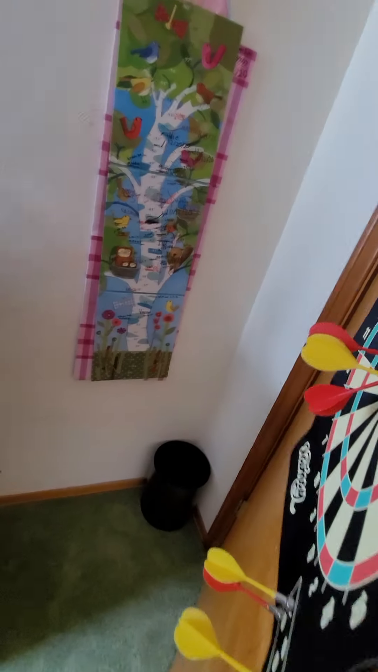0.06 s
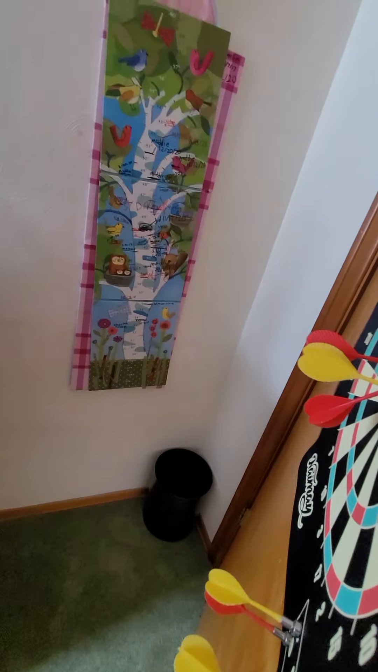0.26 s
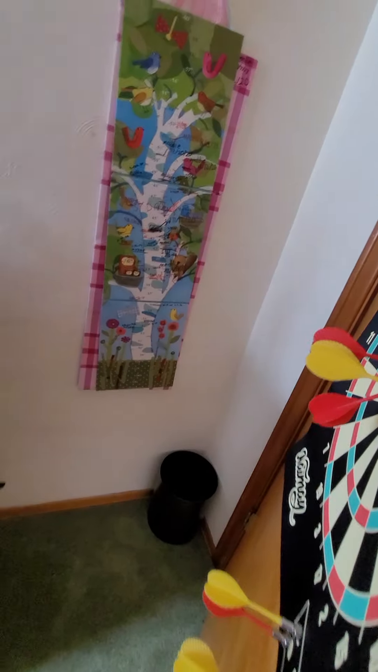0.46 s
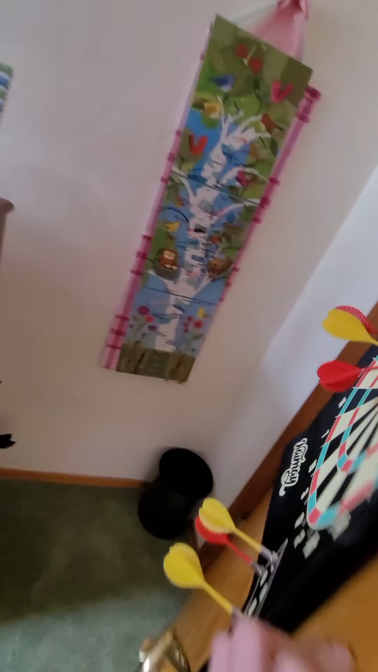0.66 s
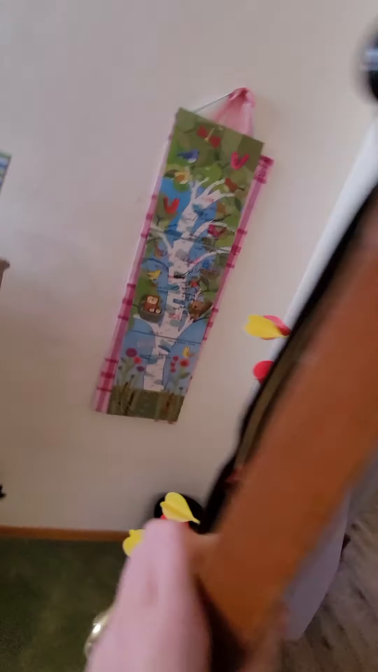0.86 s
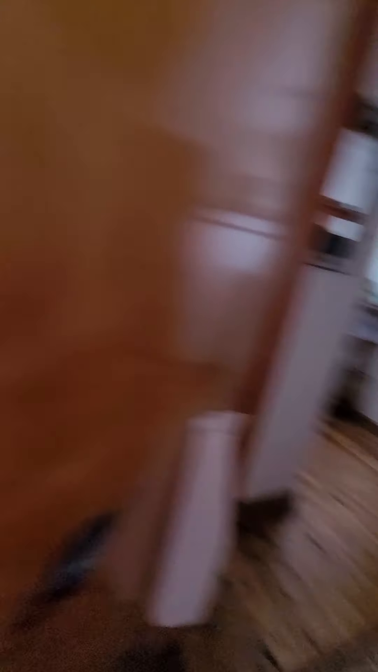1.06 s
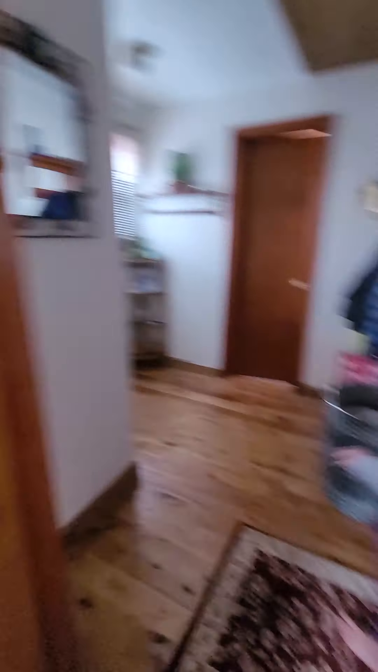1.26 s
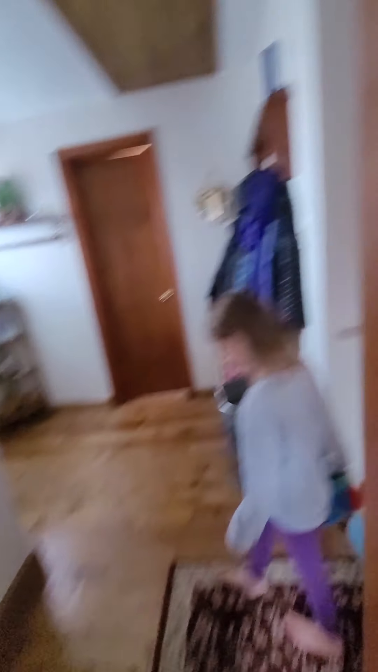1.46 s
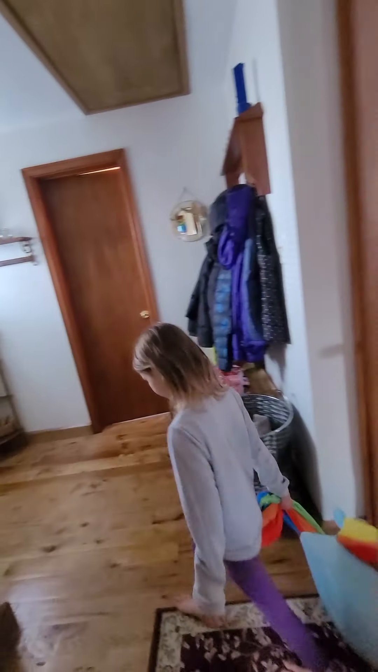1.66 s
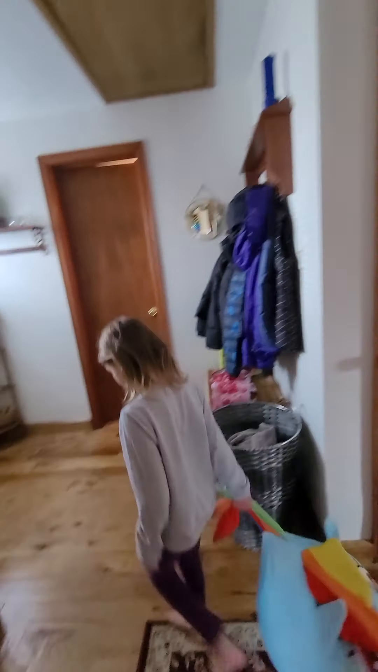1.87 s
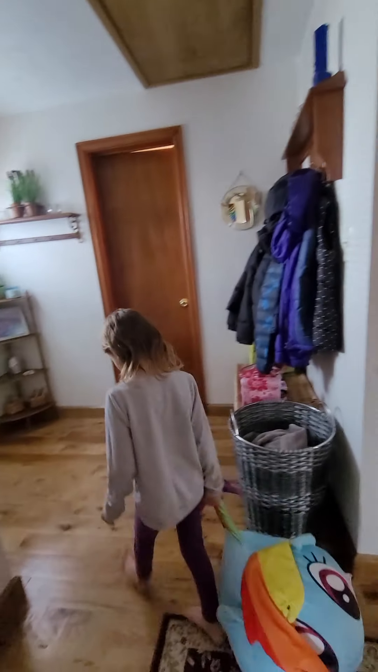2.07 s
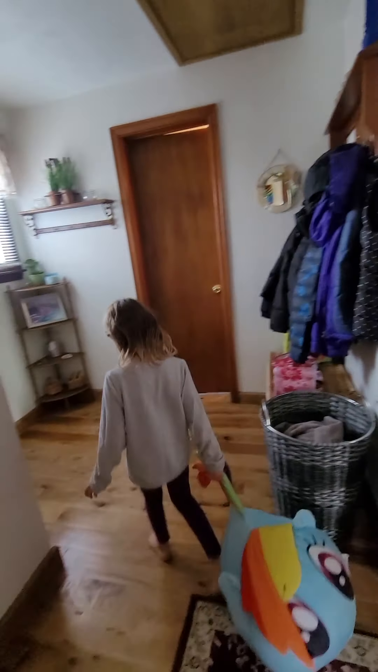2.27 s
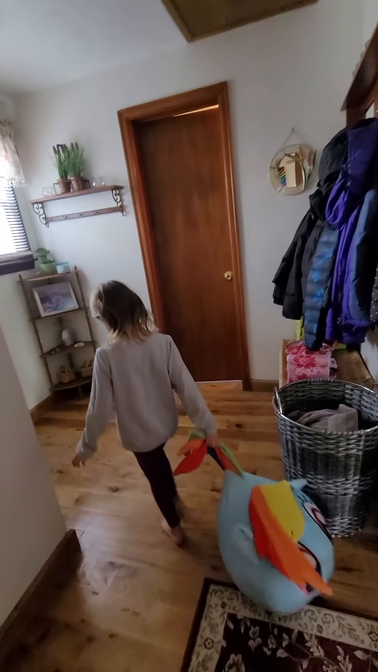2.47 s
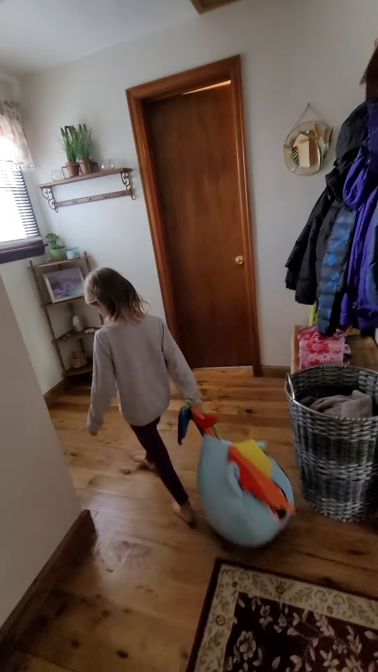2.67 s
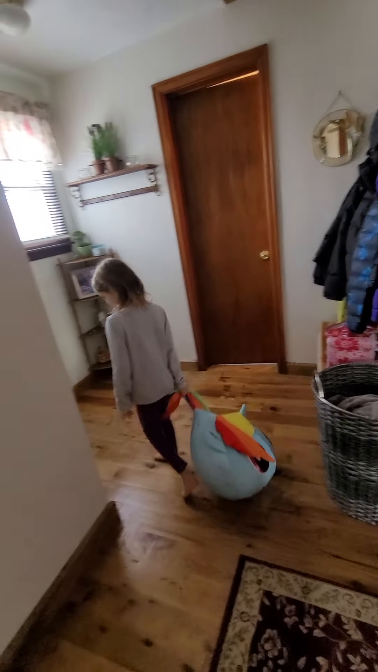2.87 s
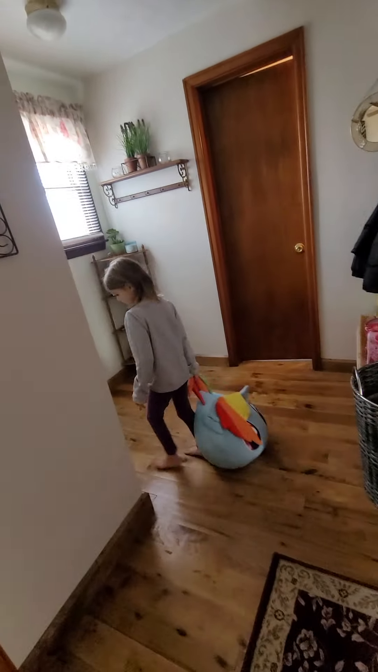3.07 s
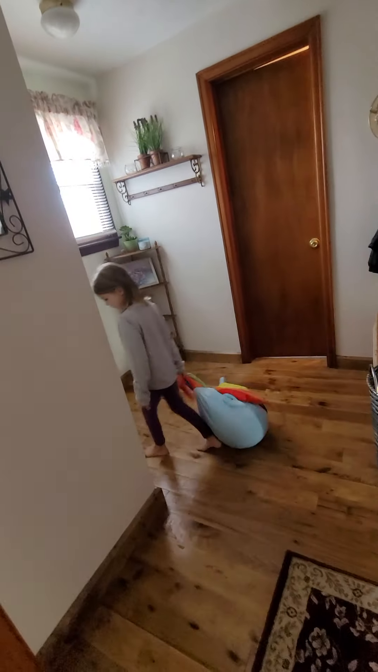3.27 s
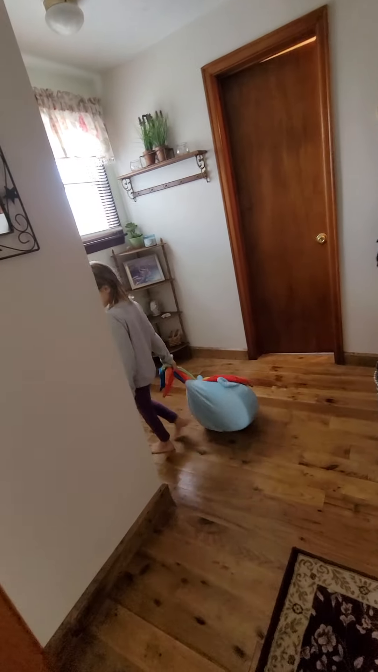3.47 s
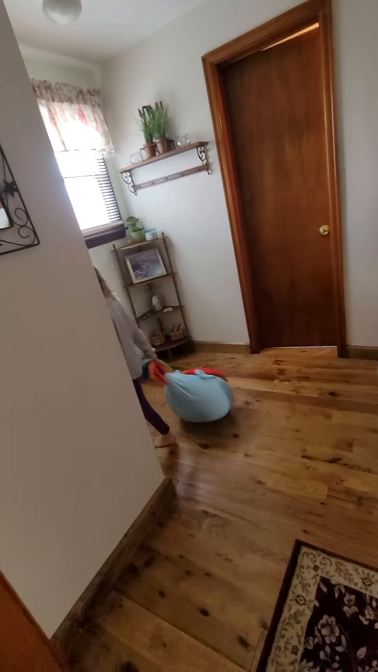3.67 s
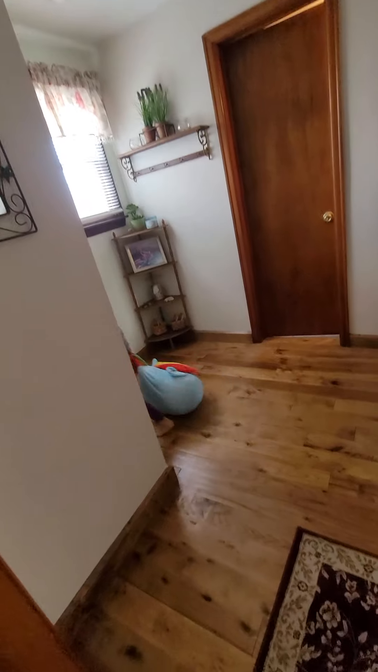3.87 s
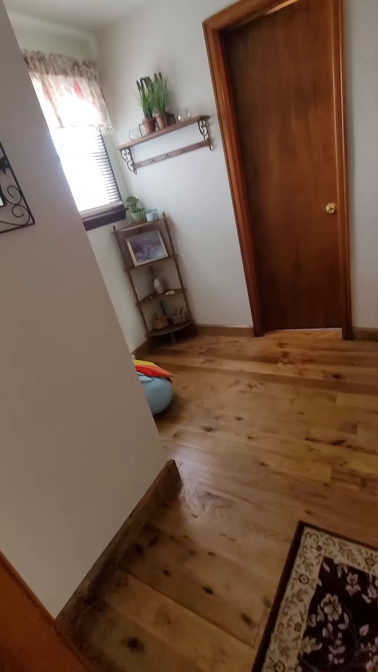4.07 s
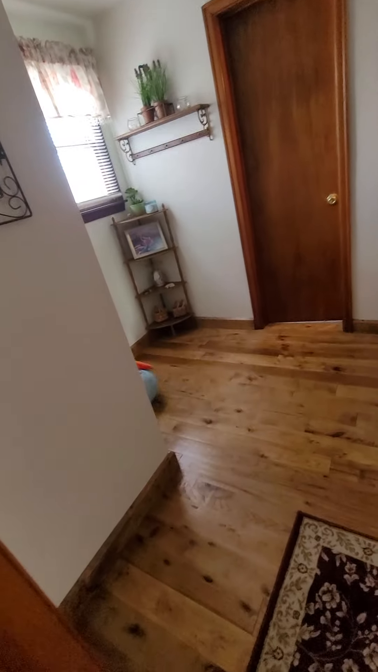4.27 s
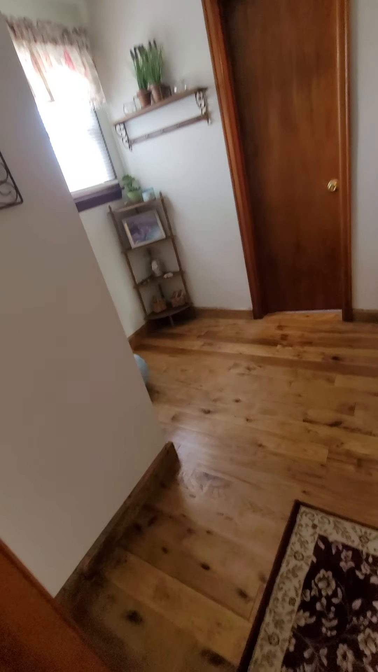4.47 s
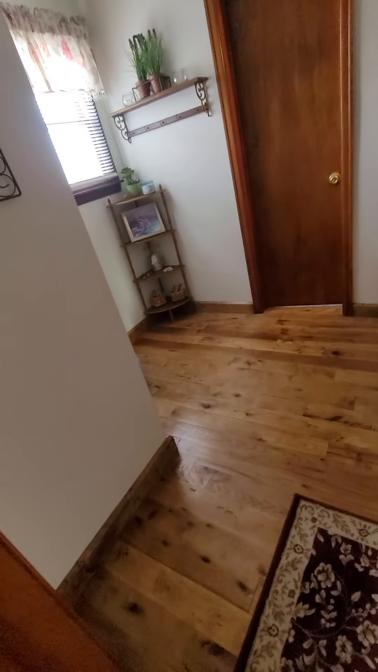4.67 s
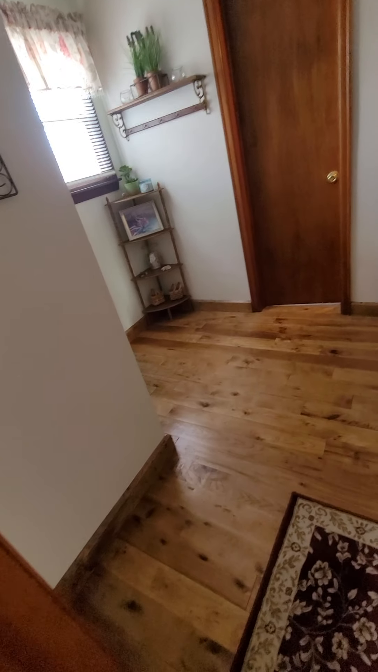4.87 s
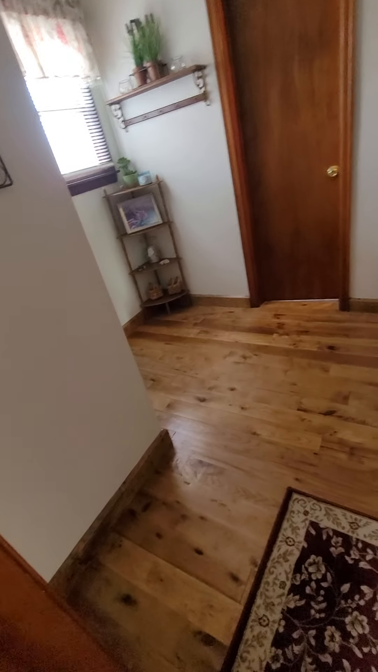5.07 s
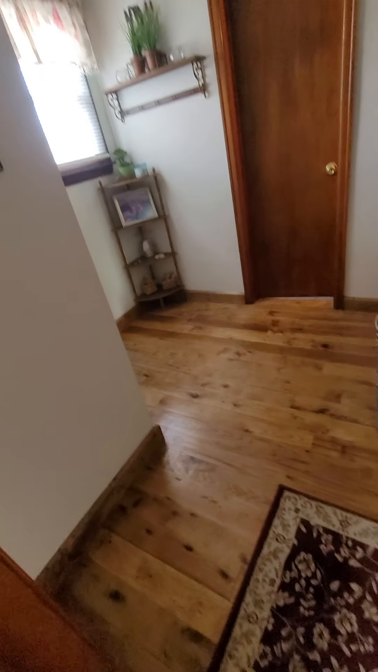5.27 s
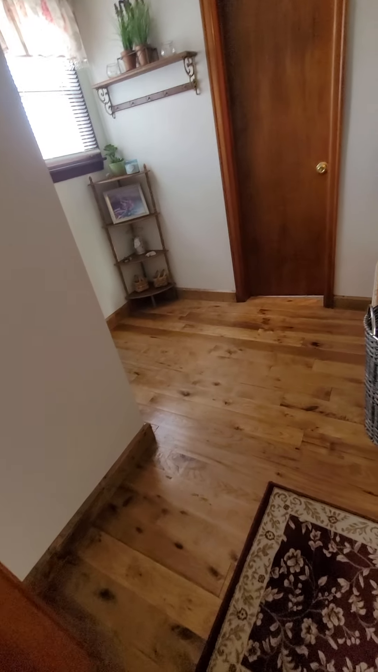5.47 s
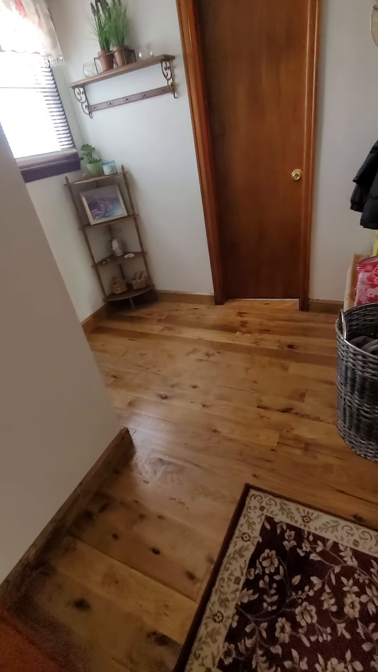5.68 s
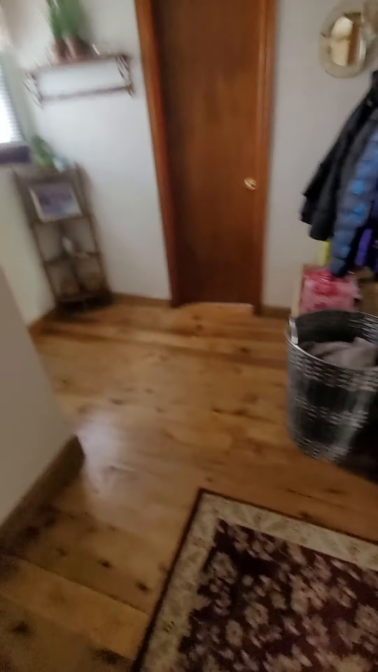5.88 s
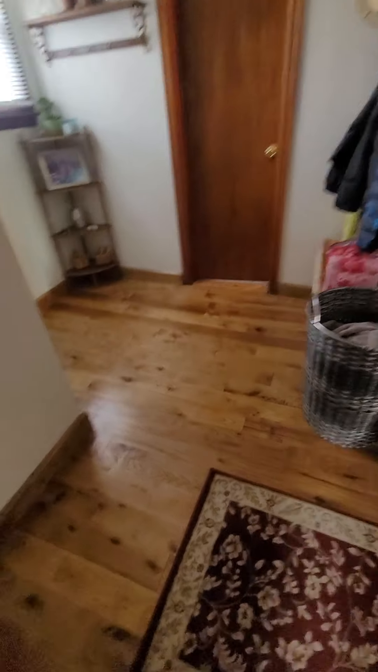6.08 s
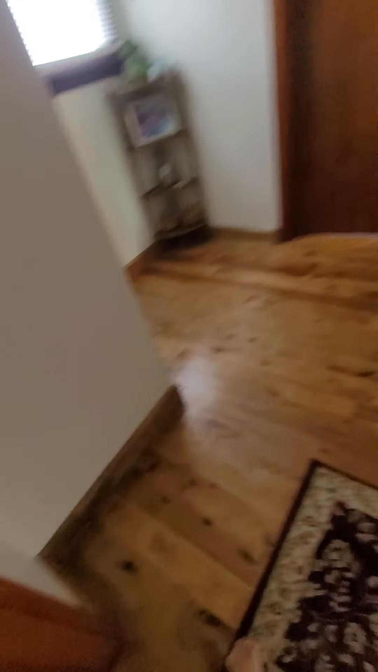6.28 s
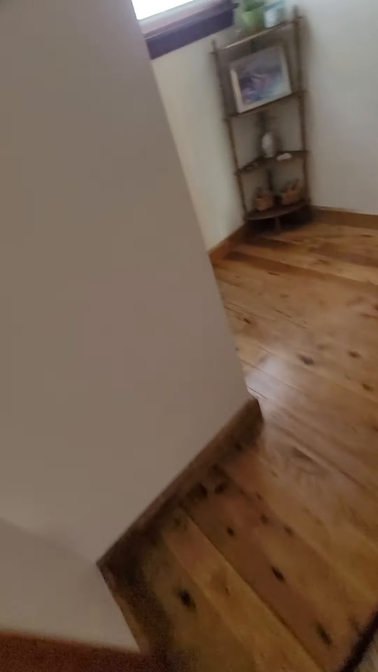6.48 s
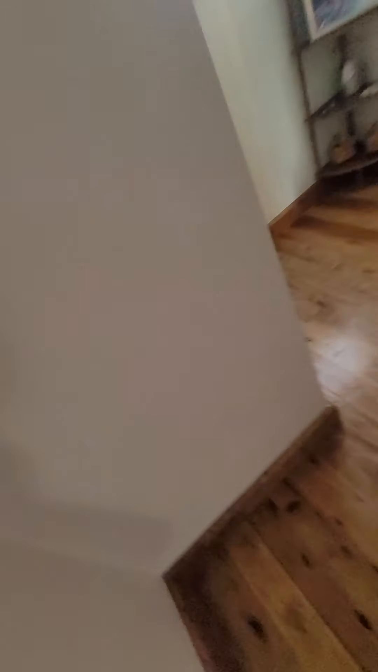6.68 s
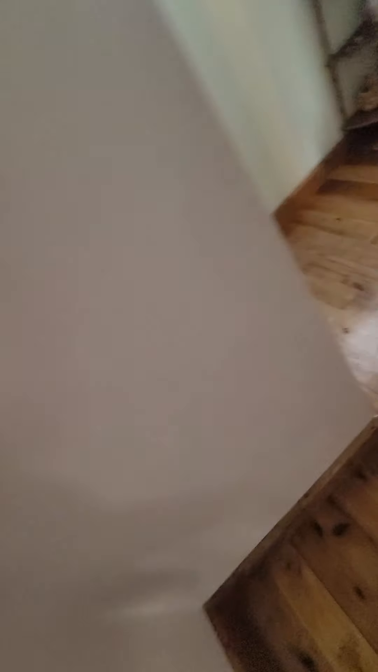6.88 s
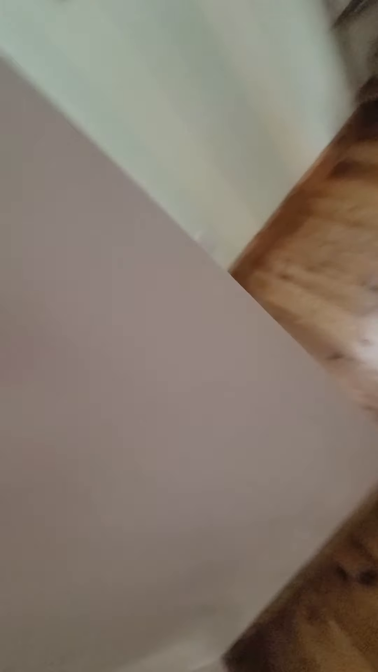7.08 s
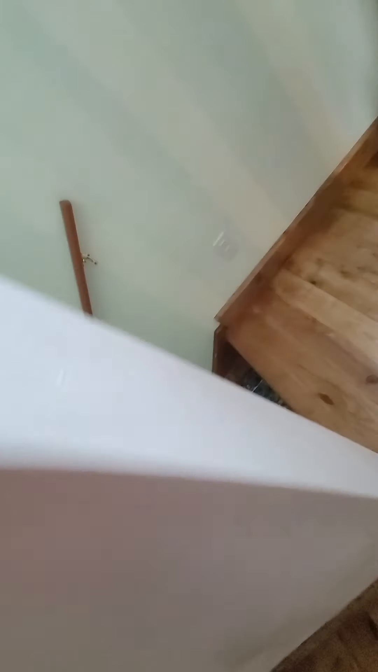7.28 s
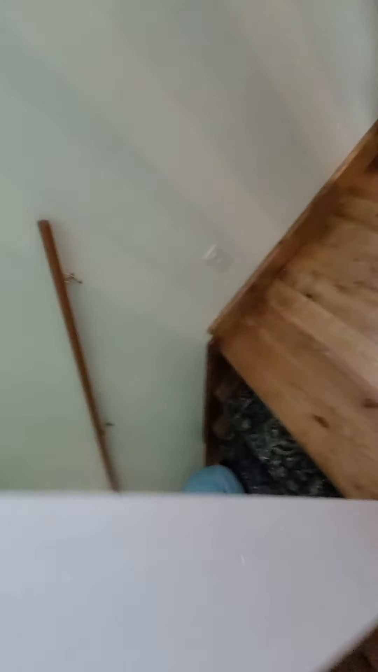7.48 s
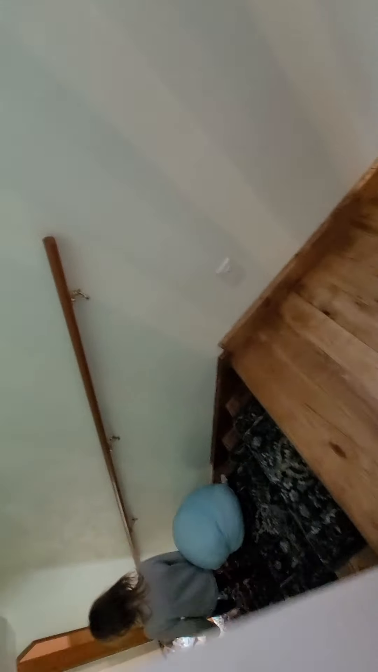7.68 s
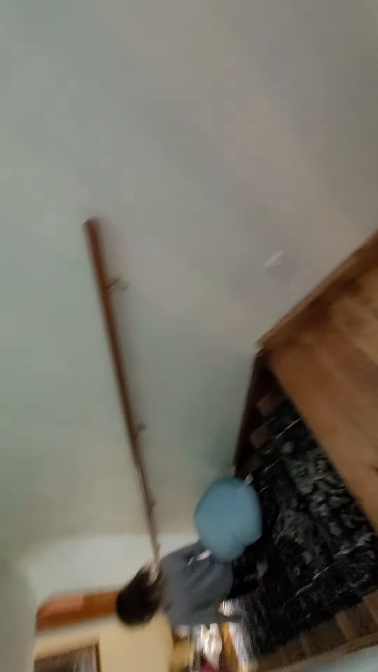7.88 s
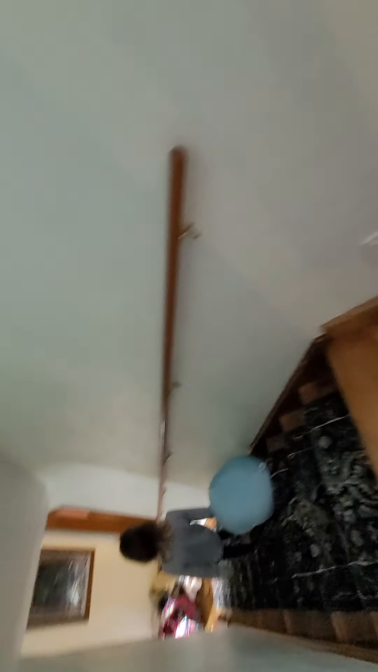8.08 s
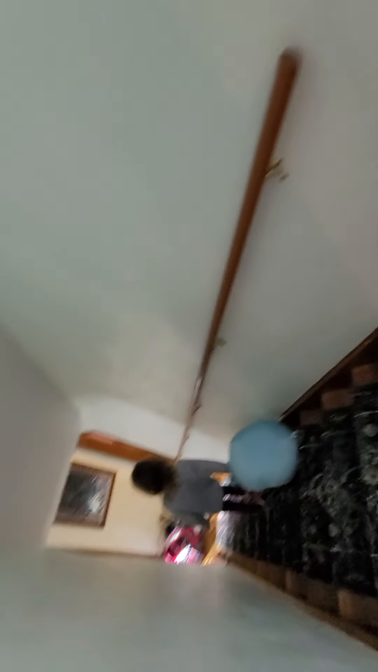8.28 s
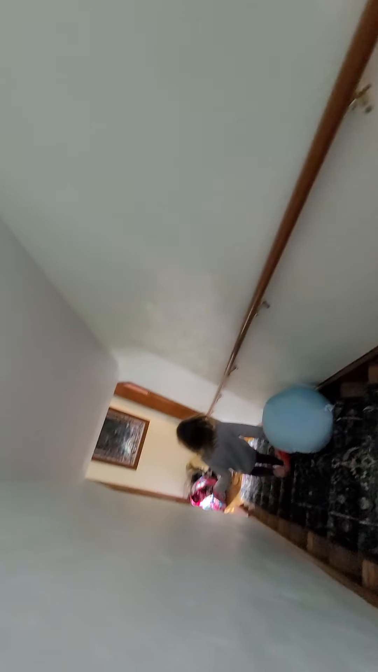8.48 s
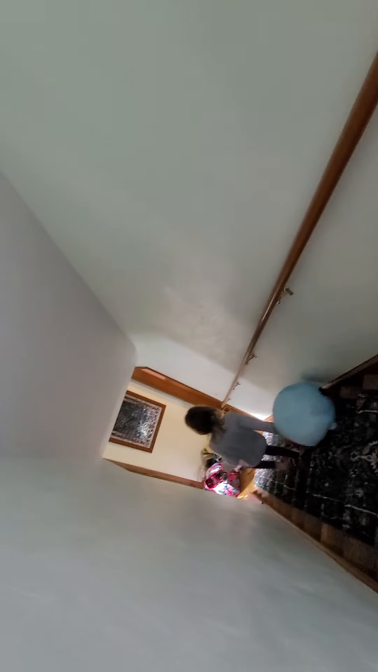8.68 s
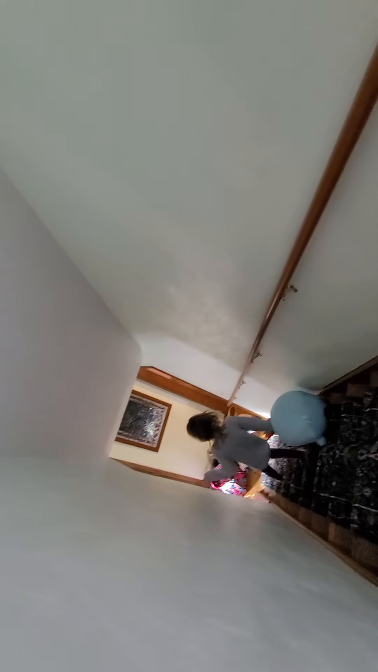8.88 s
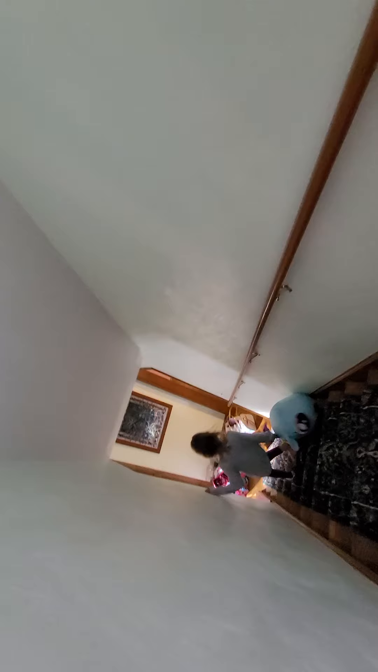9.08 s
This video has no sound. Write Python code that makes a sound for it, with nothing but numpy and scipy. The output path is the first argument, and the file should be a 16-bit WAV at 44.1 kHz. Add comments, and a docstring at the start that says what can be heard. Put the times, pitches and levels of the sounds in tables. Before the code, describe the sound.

A door gives a sharp wooden knock, followed by smaller latch clicks. Light bare feet thud unevenly over a plank floor while a dragged soft toy hisses very faintly. About halfway through, a run of small wet clicks like smacking lips begins right by the microphone, and heavier steps follow, making the boards boom. Faint clothing rustle, a short hallway echo and a low house hush lie underneath.

```python
"""Barefoot down the stairs with a soft toy

A door knocks and squeaks open. Bare feet thud over a plank floor and down carpeted stairs, setting the
boards booming, and a soft toy hisses along behind in tugs. Someone follows with the microphone: heavier
heel-first steps, rustling clothes and, very close by, small wet clicks like smacking lips, each a film
parting over a ringing cavity. A short hallway echo and the hush of the house sit underneath."""
import sys
import numpy as np
from scipy import signal
from scipy.io import wavfile

SR = 44100
rng = np.random.default_rng(int(sys.argv[2]) if len(sys.argv) > 2 else 0)


def transcribe(signal):
    """Save signal, clipped to [-1, 1], as a 16-bit WAV file at the path in sys.argv[1]."""
    frames = np.atleast_2d(signal).T
    limited = np.clip(frames, -1, 1)
    pcm = np.round(limited * 32767).astype(np.int16)
    wavfile.write(sys.argv[1], SR, pcm)


N = 403074
T = np.arange(int(.55 * SR)) / SR   # time since a hit, s

# noise colours of the quiet house, clothes, dragged plush and scuffs: f/Hz, level per Hz/dB
HUSH_COLOUR = [(22, 1), (71, 9), (123, -6), (544, -9), (900, -47), (4400, -70)]
RUSTLE_COLOUR = [(170, 9), (520, 3), (850, -4), (3200, -8.5), (4500, -21.5), (9000, -32)]
PLUSH_COLOUR = [(1500, -6.5), (4500, 1.5), (8000, 0), (15500, -1)]
SCUFF_COLOUR = [(500, 20.5), (1100, 3.5), (3100, 2.5), (15000, -10.5)]
# swells of the moving clothes: t/s, level/dB
RUSTLE_LEVEL = [(0, -60), (.5, -68), (1.4, -60.5), (2, -67), (5, -70), (6.3, -68), (7.15, -60.5),
                (7.6, -66), (9.14, -63.5)]
# knocks of door, latch and boards, and ticks of toes: t/s, level/dB, pitch/Hz, low-pass/Hz
KNOCKS = [(0.0225, -12.5, 597, 880), (0.3456, -46, 476, 1100), (0.7735, -33, 1310, 2170),
          (.778, -36.5, 750, 1190), (.783, -41, 1696, 2560), (1.2618, -34.5, 1134, 3300),
          (1.87, -51.5, 520, 1283), (2.047, -59.5, 900, 4056), (2.156, -39.5, 314, 1270),
          (2.297, -41.5, 495, 645), (2.592, -52.5, 400, 2070), (2.735, -46.5, 487, 1740),
          (3.417, -48.5, 485, 1600), (4.734, -50, 192, 350), (4.844, -42, 1470, 3360),
          (6.598, -54, 1480, 2520), (6.903, -27, 170, 230), (7.466, -43, 270, 400),
          (7.529, -41.5, 269, 900), (7.735, -35, 305.4, 457), (8.603, -32.5, 420, 2000),
          (8.891, -40.5, 280, 450), (9.081, -33, 256, 400)]
# modes of the knocked wood, and of the floor and stairs: f/Hz, level/dB
WOOD_MODES = [(377, -4), (511, -6.5), (960, -13), (1190, -5.5), (1860, -13.5), (3100, -2)]
FLOOR_MODES = [(35, -2), (59, -3), (72, -1.5), (88, -5), (120, -1.5), (150, -4.5), (181, -1.5), (247, -9),
               (305, -4), (380, -3.5), (490, -6.5)]
# the door's jolt, then light, flat footfalls: t/s, boom/dB, board pitch/Hz, t60/s
LIGHT_STEPS = [(0.0298, -42, 72.3, 0.55), (0.677, -44.5, 60, 0.67), (1.182, -41.5, 75, 0.33),
               (1.298, -42, 47, 0.31), (1.396, -36, 63.5, 0.1), (2.253, -22.5, 87, 0.16),
               (2.286, -31.5, 83.3, 0.041), (2.795, -30.5, 79.5, 0.12), (3.311, -32.5, 70.5, 0.29)]
# the follower's steps: heel t/s, heel level/dB, full weight t/s, boom/dB, board pitch/Hz
HEAVY_STEPS = [(5.194, -56, 5.24, -42, 59), (5.722, -47.5, 5.728, -34.5, 81.8),
               (6.245, -46, 6.321, -35, 53.8), (6.865, -39.5, 6.901, -25, 96),
               (7.464, -48, 7.522, -36, 54.3), (8.011, -41, 8.089, -42, 56.4), (8.555, -36, 8.6, -22, 61.7),
               (9.078, -39.5, 9.085, -37, 109)]
# faint hinge squeaks: t/s, length/s, level/dB, f/Hz
SQUEAKS = [(0.139, 0.13, -77, 4060), (0.655, 0.1, -61, 1375)]
# close wet clicks: t/s, pop/dB, cavity pitch/Hz, crack/dB, fizz/dB, fizz resonance/Hz
WET_CLICKS = [(0.555, -60, 382, -52, -47, 5950), (4.175, -46.5, 555, -30.5, -28.5, 5670),
              (4.8005, -18, 465, -7.5, -36, 3230), (4.832, -50, 500, -45, -30.5, 5300),
              (5.1264, -10, 610, -12.5, -23.5, 5250), (5.138, -16, 418, -18, -26.5, 1200),
              (5.32, -27, 490, -9.5, -17, 3410), (5.327, -39.5, 487, -20, -22, 12550),
              (5.6656, -17, 550, -9, -27, 2650), (5.855, -31, 444, -30.5, -36.5, 3650),
              (6.056, -19.5, 510, -15.5, -36, 3000), (6.435, -33, 713, -17, -29.5, 2990),
              (6.861, -19.5, 600, -29, -27.5, 5600), (6.884, -21, 596, -21, -33.5, 3300),
              (7.081, -32, 600, -20, -25.5, 2680), (7.514, -30, 319, -25, -33.5, 2310),
              (7.73, -35.5, 710, -31, -33, 2950), (7.76, -36, 382, -27, -34, 2970),
              (7.928, -35, 796, -31.5, -31, 3220), (8.409, -37, 500, -36, -36.5, 2990)]
# the clicks drift to the right: t/s, left minus right/dB
CLICK_PAN = [(5.9, -2), (6.4, -6.5), (7.7, -10)]
# tugs on the toy: start/s, end/s, hiss/dB
TUGS = [(.92, 1.085, -68), (1.325, 1.85, -64), (2.66, 3.106, -62), (3.098, 4.107, -70.5),
        (4.164, 4.793, -68.5), (7.697, 7.992, -70.5), (8.08, 8.134, -57.5), (8.268, 8.33, -62)]
# chirps of a small wet cavity opening: t/s, level/dB
CHIRPS = [(5.124, -31.5), (5.667, -18.5), (7.046, -51)]
# scuffs of soles and sleeves: t/s, length/s, level/dB
SCUFFS = [(6.109, 0.13, -58.5), (6.43, 0.17, -60), (6.781, 0.045, -60.5), (6.874, 0.062, -50),
          (7.816, 0.36, -60.5), (8.573, 0.13, -55)]
# resonances in the scuffs: f/Hz, width/Hz
SCUFF_RINGS = [(3100, 310), (5900, 650)]
# direction of the sounds as the microphone turns: t/s, lead of the right side/ms
BEARING = [(.03, -0.46), (.35, 0.47), (3.2, 0.53), (4.8, -0.15), (6.1, -0.12), (6.8, 0.46)]
# stereo image of diffuse sound: f/Hz, left-right correlation
CORRELATION = [(60, 0.88), (400, 0.93), (1000, 0.03)]
# decay of the hallway: f/Hz, t60/s
HALL_T60 = [(100, 0.69), (550, 0.32), (14000, 0.14)]
# colour of the hallway: f/Hz, level/dB
HALL_COLOUR = [(25, 2.5), (500, -2), (14000, -6.5)]


def from_db(db):
    return 10 ** (np.asarray(db) / 20)


def rms_one(x):
    return x / np.sqrt(np.mean(x ** 2) + 1e-20)


def at_hz(curve, hz):
    """Read a curve on a log-frequency axis."""
    freqs, values = np.transpose(curve)
    return np.interp(np.log(hz), np.log(freqs), values)


def at_time(curve, s):
    return np.interp(s, *np.transpose(curve))


def attack(rise_s):
    return 1 - np.exp(-(T / rise_s) ** 2)


def fade(t60):
    """Falls by 60 dB in t60 seconds."""
    return np.exp(-np.minimum(np.log(1000) * T / t60, 60))


def cut(x, hz, kind, order=2):
    """Butterworth filter."""
    sos = signal.butter(order, np.clip(hz, 10, .47 * SR), kind, fs=SR, output="sos")
    return signal.sosfilt(sos, x + 1e-18)


def resonate(x, hz, width_hz):
    """A resonant band-pass, unity gain at its peak."""
    return signal.lfilter(*signal.iirpeak(hz, hz / width_hz, fs=SR), x)


def add(out, s, sound):
    """Mix a sound in from time s."""
    at = max(round(s * SR), 0)
    out[:, at:at + sound.shape[-1]] += sound[..., :N - at]


def pan(left_db):
    """Stereo gains for a left-minus-right level."""
    return from_db(left_db * np.array([[.5], [-.5]]))


def place(s, sound):
    """Place a hit in stereo: the near side hears it first."""
    lead_s = at_time(BEARING, s) / 1000
    return np.array([np.interp(T - max(lag, 0), T, sound, left=0) for lag in (lead_s, -lead_s)])


def flutter(rate_hz, depth_db):
    """A multiplier that wanders at random around 1."""
    knots = rng.standard_normal(int(N / SR * rate_hz) + 2)
    return from_db(depth_db * np.interp(np.arange(N) / SR * rate_hz, np.arange(len(knots)), knots))


def stereo_bands(size, colour):
    """Half-octave bands of coloured noise, centred in the bass and wide in the treble."""
    edges = 22 * 2 ** np.arange(0, 10.1, .5)
    white = rng.standard_normal((2, 2, size))
    for k, (low, high) in enumerate(zip(edges, edges[1:])):
        if high > colour[0][0] and low < colour[-1][0]:
            mid, side = cut(white[k % 2], [low, high], "band")
            hz = np.sqrt(low * high)
            alike = at_hz(CORRELATION, hz)
            band = np.sqrt(1 + alike) * mid + np.sqrt(1 - alike) * side * [[1], [-1]]
            yield hz, from_db(at_hz(colour, hz)) * band


def noise(colour, patchy_db):
    """Coloured stereo noise, each band wandering on its own; rms 1."""
    bands = stereo_bands(N, colour)
    return rms_one(sum(band * flutter(rate_hz=17, depth_db=patchy_db) for _, band in bands))


def tone(hz, rise_s, t60):
    """One resonance, steady or gliding, that swells to 1 and dies."""
    swell = attack(rise_s) * fade(t60)
    return np.sin(2 * np.pi * np.cumsum(hz * np.ones(len(T))) / SR) * swell / swell.max()


def ring(modes, t60_at_100hz, slope, spread_db, detune):
    """High modes die sooner; each hit lands on a new spot, varying their level, tuning and sign."""
    out = np.zeros(len(T))
    for hz, db in modes:
        strength, tuning, polarity = rng.standard_normal(3)
        wave = np.sign(polarity) * np.sin(2 * np.pi * hz * (1 + detune * tuning) * T)
        out += from_db(db + spread_db * strength) * wave * fade(t60_at_100hz * (hz / 100) ** -slope)
    return out


def house_hush(level_db=-67):
    """The bed: a steady, low room tone."""
    return from_db(level_db) * noise(HUSH_COLOUR, patchy_db=0)


def clothes_rustle():
    """Cloth rubs on cloth: dull noise with slow swells and a fast crackle."""
    level = from_db(at_time(RUSTLE_LEVEL, np.arange(N) / SR))
    rub = noise(RUSTLE_COLOUR, patchy_db=2)
    return level * rub * flutter(rate_hz=8, depth_db=1.5) * flutter(rate_hz=350, depth_db=2.2)


def wood_knocks(ring_cycles=24, sharp_db_per_octave=17):
    """Struck wood: a contact click, one main note, weaker modes and a short, dense body."""
    out = np.zeros((2, N))
    for s, db, hz, top_hz in KNOCKS:
        click_db = 15.5 + sharp_db_per_octave * np.log2(hz / 700)   # small, high parts hit sharper
        note = tone(hz, rise_s=0.0013, t60=ring_cycles / hz)
        modes = ring(WOOD_MODES, t60_at_100hz=0.29, slope=0.52, spread_db=4.5, detune=0.026)
        direct = from_db(click_db) * (T == 0) + note + from_db(-10.5) * modes
        burst = from_db(-2) * rng.standard_normal((2, len(T))) * fade(t60=0.11)
        body = burst + from_db(7.5) * resonate(burst, hz, width_hz=0.53 * hz)
        knock = cut(place(s, direct) + body, .5 * hz, "high")
        knock = cut(knock, top_hz, "low")
        add(out, s, from_db(db) * cut(knock, 5000, "low", order=5))   # dull, cut steeply above 5 kHz
    return out


def footfall(boom_db, hz, t60, floor_db, contact_hz):
    """Weight eases on: the boards underfoot boom, and the floor rings as high as the contact reaches."""
    boom = tone(hz, rise_s=0.013, t60=t60)
    floor = ring(FLOOR_MODES, t60_at_100hz=0.38, slope=0.76, spread_db=3, detune=0.0361)
    floor = cut(floor * attack(rise_s=0.0054), contact_hz, "low", order=3)
    return from_db(boom_db) * boom + from_db(floor_db) * floor


def firmness(db, middling_db=-28, db_per_octave=35.5):
    """A stronger step is brighter: its cutoff as a ratio to that of a middling step."""
    return 2 ** ((db - middling_db) / db_per_octave)


def footsteps(heavy_t60=0.31):
    """The door's jolt and light steps are single thuds; heavy steps land hard heel, then full weight."""
    out = np.zeros((2, N))
    for s, db, hz, t60 in LIGHT_STEPS:
        add(out, s, footfall(db, hz, t60, floor_db=db - 14.5, contact_hz=159 * firmness(db)))
    for heel_s, heel_db, weight_s, db, hz in HEAVY_STEPS:
        add(out, heel_s, footfall(heel_db - 4.5, hz, heavy_t60, floor_db=heel_db, contact_hz=350))
        add(out, weight_s, footfall(db, hz, heavy_t60, floor_db=db - 4.5, contact_hz=212 * firmness(db)))
    return out


def hinge_squeaks(pitch_arch=0.024):
    """A dry hinge sings: its pitch rises and falls with the swing, and wavers."""
    out = np.zeros((2, N))
    for s, length, db, hz in SQUEAKS:
        swing = np.sin(np.pi * np.minimum(T / length, 1))
        waver = flutter(rate_hz=300, depth_db=2.1)[:len(T)]
        pitch = hz * (1 + pitch_arch * (swing - .5)) * waver
        add(out, s, from_db(db) * swing * np.sin(2 * np.pi * np.cumsum(pitch) / SR))
    return out


def film_crack(grains, tints, pop_db, brisk_db=-16):
    """A wet film tears in a burst of tiny cracks; unit energy per side on average."""
    parting_s = 0.001 * 2 ** ((brisk_db - pop_db) / 6)   # a weaker click parts more slowly
    tear = (T == 0) + grains * np.exp(-T / parting_s)
    crack = np.array([resonate(side, 2350 * tint, width_hz=1900) for side, tint in zip(tear, tints)])
    crack = cut(crack, 3800, "low", order=3)
    return np.sqrt(2) * crack / np.linalg.norm(crack)


def film_fizz(grains, tints, thin_hz):
    """Fine, bright crackle trails the tear, with one thin resonance in it."""
    crackle = grains * fade(t60=0.023)
    airy = np.array([resonate(side, 10500 * tint, width_hz=8500) for side, tint in zip(crackle, tints)])
    return airy + from_db(10) * resonate(crackle, thin_hz, width_hz=650)


def wet_clicks(ring_cycles=4.9, open_s=0.00066, touch_to_parting_s=0.0012):
    """Like smacking lips: a wet film cracks, fizzes and starts a small cavity ringing."""
    out = np.zeros((2, N))
    for s, pop_db, hz, crack_db, fizz_db, thin_hz in WET_CLICKS:
        grains = rng.standard_normal((4, len(T))) * rng.exponential(0.13, len(T))
        tints = np.exp(0.16 * np.clip(rng.standard_normal(2), -2, 2))   # a tuning ratio for each side
        crack = from_db(crack_db) * film_crack(grains[2:], tints, pop_db)
        fizz = from_db(fizz_db) * film_fizz(grains[:2], tints, thin_hz)
        t60 = ring_cycles / hz
        overtone = from_db(-12) * tone(1.9 * hz * tints[0], open_s, t60)
        pop = from_db(pop_db) * place(s, tone(hz, open_s, t60) + overtone)
        left_db = at_time(CLICK_PAN, s)
        add(out, s + touch_to_parting_s, pop * pan(left_db) + (crack + fizz) * pan(left_db + 4))
    return out


def tug_envelope(now, attack_s=0.063, release_s=0.043, walk_from_s=6.05):
    """Each tug gathers speed and dies quickly, over a faint cloth hiss that lifts with the walking."""
    gain = from_db(np.where(now < walk_from_s, -78, -75.5))
    for start, end, db in TUGS:
        pull = 1 - np.exp(-np.maximum(now - start, 0) / attack_s)
        release = np.exp(-np.maximum(now - end, 0) / release_s)
        gain = np.hypot(gain, from_db(db) * pull * release)
    return gain


def toy_drag(direct_share=0.1):
    """Plush hisses over the planks in grainy surges; a little arrives straight, the rest off the walls."""
    now = np.arange(N) / SR
    surge = flutter(rate_hz=14, depth_db=1.5) * flutter(rate_hz=700, depth_db=3)
    diffuse = noise(PLUSH_COLOUR, patchy_db=2)
    right = noise(PLUSH_COLOUR, patchy_db=1.5)[0]
    lag = np.round(at_time(BEARING, now) / 1000 * SR).astype(int)
    left = right[np.clip(np.arange(N) - lag, 0, N - 1)]
    hiss = np.sqrt(direct_share) * np.array([left, right]) + np.sqrt(1 - direct_share) * diffuse
    return tug_envelope(now) * hiss * surge


def wet_chirps(start_hz=900, end_hz=1550, glide_s=0.00573):
    """As a wet cavity opens, its resonance slides upward."""
    out = np.zeros((2, N))
    pitch = end_hz + (start_hz - end_hz) * np.exp(-T / glide_s)
    for s, db in CHIRPS:
        add(out, s, from_db(db) * tone(pitch, rise_s=0.0021, t60=0.033))
    return out


def scuffs():
    """Soles and sleeves brush in gritty, ringing strokes that swell quickly and die away."""
    grit = sum(band for _, band in stereo_bands(N, SCUFF_COLOUR)) * flutter(rate_hz=400, depth_db=3.5)
    ringing = sum(resonate(grit, hz, width) for hz, width in SCUFF_RINGS)
    strokes = np.zeros((2, N))
    for s, length, db in SCUFFS:
        age = np.e * T / length
        add(strokes, s, from_db(db) * (age * np.exp(1 - age)) ** 2)
    return strokes * rms_one(grit + from_db(5) * ringing)


def hallway(send):
    """Strong early reflections off near walls, then a tail that dies sooner in the treble."""
    early = from_db(13.5) * fade(t60=0.12)
    bands = stereo_bands(len(T), HALL_COLOUR)
    tail = sum(band * (early + fade(at_hz(HALL_T60, hz))) for hz, band in bands)
    impulse = rms_one(tail * attack(rise_s=0.0017)) / np.sqrt(len(T))
    return signal.fftconvolve(send, impulse, axes=1)[:, :N]


def scene():
    """The mix: knocks echo most in the hallway; steps and dulled clicks echo faintly."""
    steps = footsteps()
    wood = wood_knocks() + hinge_squeaks()
    close = wet_clicks() + wet_chirps()
    dulled = cut(close, 1930, "low", order=1)   # the clicks come back dull from the walls
    echo = hallway(from_db(-12.5) * steps + from_db(-3) * wood + from_db(-11.5) * dulled)
    friction = toy_drag() + clothes_rustle() + scuffs()
    return steps * pan(left_db=-.6) + wood + close + echo + friction + house_hush()


def record(dry, left_port_hz=20.9, bottom_hz=18, top_hz=16100):
    """The microphone loses the deepest bass, more on the left; the top is cut steeply."""
    ports = np.array([cut(dry[0], left_port_hz, "high", order=1), dry[1]])
    top_cut = signal.ellip(10, .1, 80, top_hz, fs=SR, output="sos")
    return signal.sosfilt(top_cut, cut(ports, bottom_hz, "high"))


dry = scene()
out = record(dry)
transcribe(out)
```